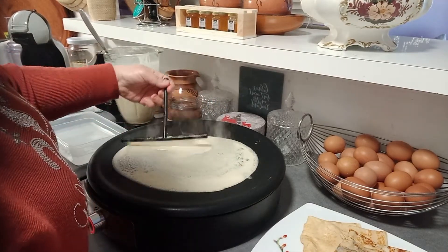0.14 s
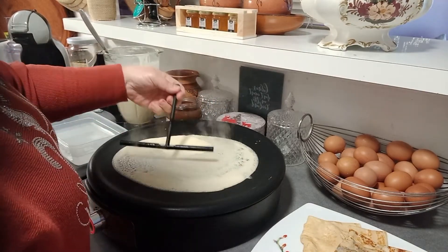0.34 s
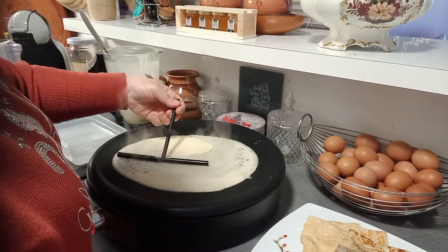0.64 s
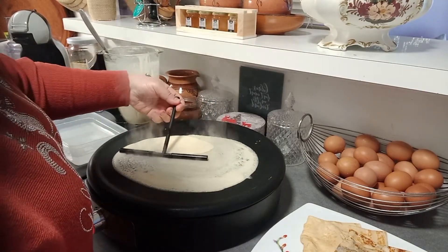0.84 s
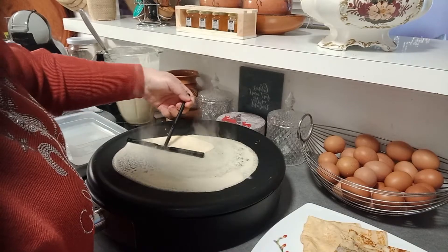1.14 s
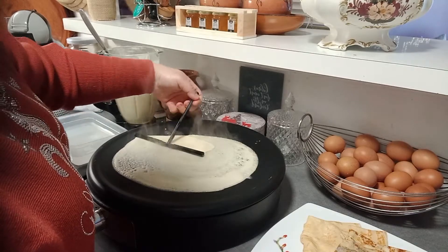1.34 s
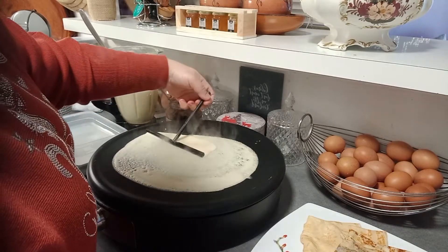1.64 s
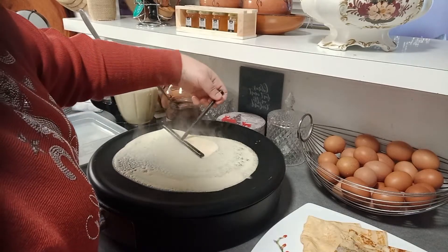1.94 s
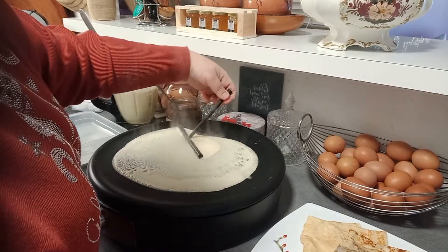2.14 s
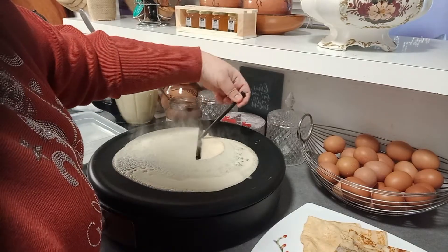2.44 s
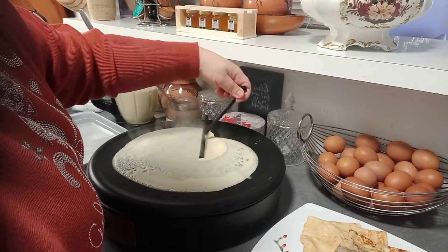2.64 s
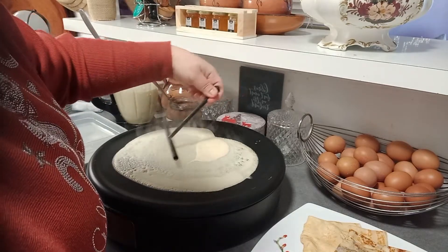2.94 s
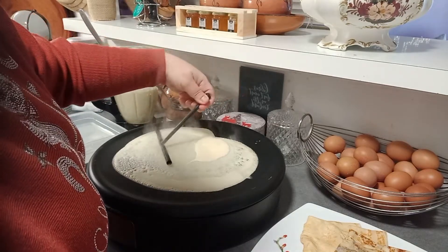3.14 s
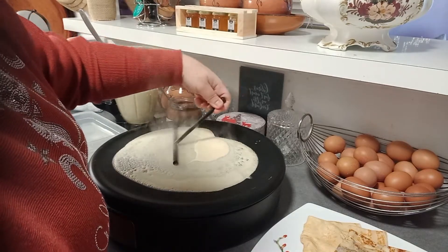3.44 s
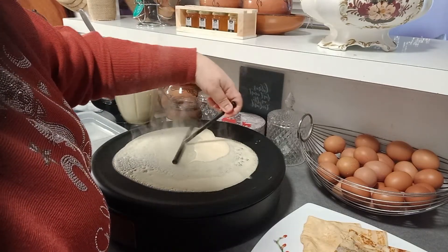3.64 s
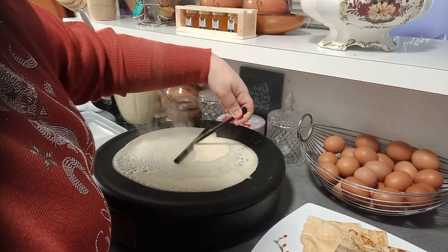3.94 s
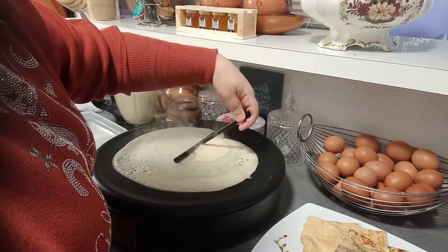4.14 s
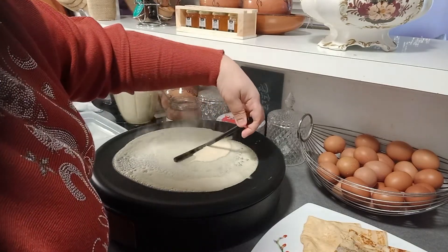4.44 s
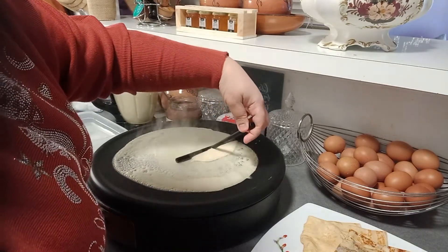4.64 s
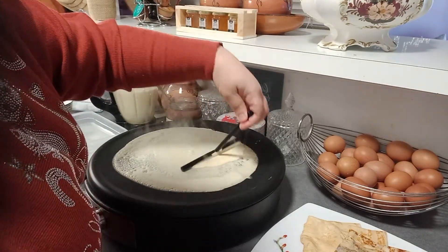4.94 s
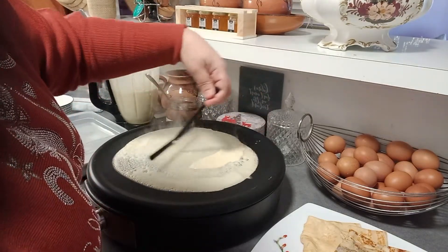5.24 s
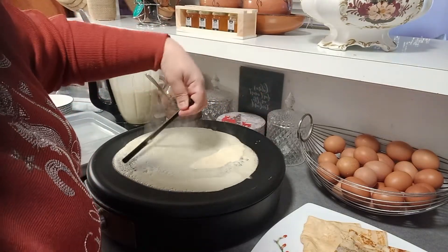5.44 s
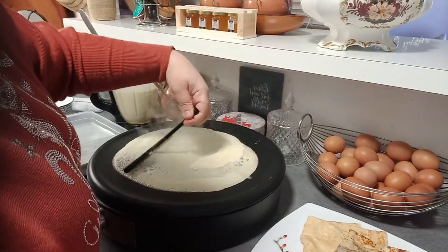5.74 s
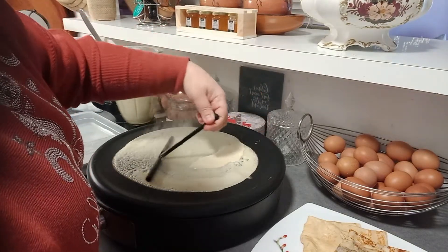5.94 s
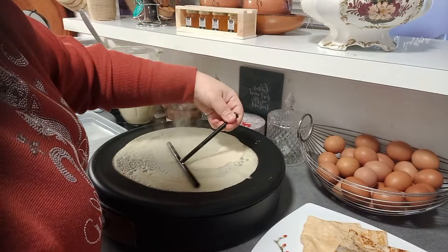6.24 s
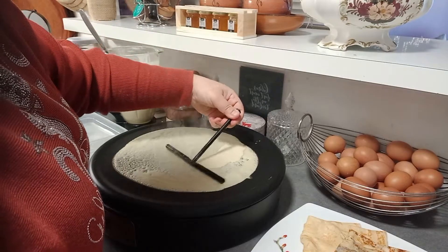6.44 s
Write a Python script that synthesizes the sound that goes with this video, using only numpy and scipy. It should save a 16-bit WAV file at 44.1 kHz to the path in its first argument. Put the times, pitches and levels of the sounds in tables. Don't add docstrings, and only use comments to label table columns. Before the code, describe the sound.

Close stereo sound of batter cooking on a hot iron plate in a small kitchen, with a faint low fan murmur far off throughout. At 0 s a strong wet hiss, bright fizz over coarse bubbling, comes with a dull hum as a spreader rubs the plate. The sizzle sinks by 1 s, then builds again to about 2.3 s with sharp pops and several clearer low humming strokes around 2 to 2.5 s. Near 3 s it drops abruptly to thin, dry crackling of separate tiny bursts, quietest around 3.8 s. Just after 3.9 s the boil returns, coarser, swelling to a peak near 4.7 s with another hum from the dragged plate. From 5 s it collapses into a flurry of crackles and spits, fading to sparse ticks, soft hiss and faint rubs by 6.5 s.

```python
import sys
import numpy as np
from scipy import signal
from scipy.fft import rfft, irfft, next_fast_len
from scipy.io import wavfile
from scipy.ndimage import uniform_filter1d, map_coordinates

SR = 44100
rng = np.random.default_rng(int(sys.argv[2]) if len(sys.argv) > 2 else 0)


def elevation(decibels):
    levels = np.asarray(decibels, float)
    return 10 ** (levels / 20)


def pcm_store(signal):
    levels = np.round(np.clip(np.atleast_2d(signal), -1, 1) * 32767)
    wavfile.write(sys.argv[1], SR, levels.astype(np.int16).T)


N = 291060
SETTING_DB_PER_S = -1.6
HALVES = np.array([[0.5], [-0.5]])


def evened(x):
    return x / np.sqrt(np.mean(x ** 2) + 1e-20)


def curves(rows):
    s, *columns = np.transpose(rows)
    return [np.interp(np.arange(N) / SR, s, column) for column in columns]


def coloured(x, points):
    f, db = np.transpose(points)
    size = next_fast_len(N)
    hz = np.minimum(np.fft.rfftfreq(size, 1 / SR), 15000)
    z = rfft(x, size)
    z = z / np.sqrt(uniform_filter1d(abs(z) ** 2, size=400) + 1e-20)
    gain = elevation(np.interp(np.log(hz + 1), np.log(f + 1), db))
    return evened(irfft(z * gain, size)[..., :N])


def resonate(x, hz, width):
    pole = np.exp((2j * np.pi * hz - np.pi * width) / SR)
    return evened(signal.lfilter([1], [1, -2 * pole, pole ** 2], x + 0j).real)


def drift(hz):
    points = rng.standard_normal(400)
    t = np.arange(0, N + 50, 50) / SR
    slow = map_coordinates(points, [t * 2 * hz], order=3, mode="wrap")
    return evened(np.interp(np.arange(N) / SR, t, slow))


# frequency in Hz, left-right correlation (0 to 1).
LIKENESS = [(60, 0.15), (180, 0.6), (350, .65), (640, 0.3), (1400, 0.15), (3100, 0), (15000, 0)]


def pair():
    size = next_fast_len(N)
    a, b = rfft(rng.standard_normal((2, size)))
    f, value = np.transpose(LIKENESS)
    same = np.interp(np.log(np.fft.rfftfreq(size, 1 / SR) + 1), np.log(f), value)
    same = np.clip(same, -1, 1)
    return irfft([a, same * a + np.sqrt(1 - same ** 2) * b], size)[:, :N]


def walls(x, wet_db, t60, count=4):
    t, out = np.arange(5000) / SR, x.copy()
    place = 2 * np.pi * np.cumsum(3.0 * (1 + 0.32 * drift(2.099))) / SR
    for k in range(count):
        taps = rng.choice([-1., 1.], (2, 5000)) * (rng.random((2, 5000)) < 0.1)
        taps *= elevation(-60 * t / t60) * (t > 0.001)
        taps /= np.linalg.norm(taps, axis=1, keepdims=True)
        share = np.cos(place / 2 + np.pi * k / count) * np.sqrt(2 / count)
        out += elevation(wet_db) * signal.oaconvolve(x * share, taps, axes=1)[:, :N]
    return out


# time in seconds, vigour in dB, bubble coarseness in dB.
BOILING = [(0.0, -44, -10.5), (0.15, -45.5, -9), (0.6, -51, -11.5), (1.0, -55, -13), (1.2, -51, -12.5),
           (1.5, -49, -8), (2.3, -45.5, -7.5), (2.7, -48, -7), (3.12, -59.5, -10), (3.4, -61.5, -14),
           (3.885, -64.5, -17.5), (3.93, -57.5, -10), (4.03, -56.5, -3), (4.35, -52, -8), (4.48, -53.5, -7),
           (4.73, -49, -9), (5.3, -63.5, -11), (6.6, -68, -16.5)]


def boiling():
    return curves(BOILING)


# frequency in Hz, level in dB per Hz.
ROOM_SPECTRUM = [(12, -61), (20, -50), (87, -9), (156, -7), (192, -15.5), (253, -4.5), (369, -14),
                 (409, -6.5), (561, -19.5), (1010, -22.5), (1220, -24.5), (1380, -15), (1500, -22.5),
                 (1850, -16.5), (3000, -47), (3900, -57), (6600, -120)]
# frequency in Hz, waver in Hz, level in dB.
FAN = [(263, .6, -79)]


def kitchen():
    t_step = 2 * np.pi / SR
    line = 0
    for hz, waver, db in FAN:
        line = line + elevation(db) * np.sqrt(2) * np.sin(t_step * np.cumsum(hz + waver * drift(2.4)))
    murmur = coloured(pair(), ROOM_SPECTRUM)
    bottom = signal.sosfiltfilt(signal.butter(2, 110, fs=SR, output="sos"), murmur)
    lumpy = murmur + (elevation(4.3 * drift(6) - 3.0) - 1) * bottom
    return elevation(-72 + 1.72 * drift(7)) * lumpy + line


# frequency in Hz, width in Hz, level in dB.
LOWEST_MODES = [(237.5, 29, 0), (309, 73, 6)]
MIDDLE_PLATE_MODES = [(426.2, 40, 0.97), (482.8, 22.5, -4.1)]
UPPER_PLATE_MODES = [(612.4, 78, 1), (657.3, 65, 0.72)]
TOP_PLATE_MODES = [(762, 32, 1.3), (851, 30, 2.3), (933, 32, 3), (983, 32, 3.6)]
# level in dB of first middle, upper, lowest, top, second middle modes.
SIMMER = [-84, -79.5, -83.5, -80, -86.5]
# start in seconds, length in seconds, force in dB,
# upper modes in relative dB, lowest modes in relative dB.
DRAGS = [(-0.05, 0.25, -60, -6.5, -7.5), (0.18, 0.25, -71.5, -0.5, 0.5), (0.777, 0.11, -70.5, 0.5, 7),
         (0.83, 0.26, -77, -3, 7.5), (1.11, 0.086, -64.5, -26, -19), (1.28, 0.26, -67, -8, -4.5),
         (1.54, 0.51, -69.5, 2.5, -6), (1.948, 0.26, -59, -4, -21), (2.186, 0.16, -65, -0.5, -22),
         (2.435, 0.12, -67.5, -1, -1), (2.78, 0.24, -83, -15, 3), (3.216, 0.75, -77, -25, -2),
         (3.965, 0.13, -85.5, 8, 13.5), (4.088, 0.12, -68.5, -4, -9), (4.55, 0.23, -83, 4, 8),
         (4.176, 0.39, -70.5, -8, 2), (4.637, 0.15, -59, -21, -11), (4.74, 0.37, -71, -43, -4),
         (5.683, 0.21, -79, -7.5, -0.5), (5.97, 0.088, -82, 2.5, 8), (6.324, 0.086, -78, -5, -4)]


def spreader():
    grip_s, lift_s = 0.06, 0.15
    t = np.arange(0, N, 60) / SR
    damping_db = np.array([[0], [1], [0], [1], [0]]) * SETTING_DB_PER_S * t
    vigour_db = boiling()[0][::60]
    power = elevation(np.array(SIMMER)[:, None] + damping_db + 0.83 * (vigour_db + 56.5)) ** 2
    for s, length, db, upper_db, low_db in DRAGS:
        touch = np.minimum((t - s) / grip_s + 0.5, (s + length - t) / lift_s + 0.5)
        touch = np.clip(touch, 0, 1)
        top_db, second_db = -3 + 1.83 * upper_db, 0.7 * upper_db
        share_db = np.array([[-2], [upper_db], [low_db], [top_db], [second_db]])
        power = power + (elevation(db + share_db) * touch ** 2) ** 2
    rub = pair() * elevation(1.9 * drift(22))
    groups = (MIDDLE_PLATE_MODES[:1], UPPER_PLATE_MODES, LOWEST_MODES, TOP_PLATE_MODES,
              MIDDLE_PLATE_MODES[1:])
    out = 0
    for group_power, modes in zip(power, groups):
        ring = evened(sum(elevation(db) * resonate(rub, hz, width) for hz, width, db in modes))
        out = out + np.interp(np.arange(N) / SR, t, np.sqrt(group_power)) * ring
    return out


# time in seconds, peak in dB, low part in relative dB.
BURSTS = [(0.6604, -40.9, -7.8), (0.7388, -36.3, -11.3), (0.8442, -41.4, -12.8), (1.7426, -36.7, -11.4),
          (2.1174, -33.3, -8.9), (2.5807, -34.5, -8.8), (2.7254, -33.3, -14.7), (2.9269, -38.4, -11.4),
          (3.0187, -44.8, -7.7), (3.0395, -37.5, -14.7), (3.0765, -46.6, -5.6), (3.0828, -46.4, -10.5),
          (3.1075, -45.9, -10.1), (3.126, -46.9, -16.8), (3.1785, -47.2, -10.0), (3.2537, -43.3, -20.7),
          (3.3162, -45.5, -13.6), (3.3432, -44.7, -17.0), (3.3562, -44.6, -20.1), (3.3706, -45.8, -15.9),
          (3.3844, -45.6, -18.0), (3.408, -38.5, -14.0), (3.4575, -49.3, -18.2), (3.5039, -45.3, -13.2),
          (3.5185, -49.2, -14.5), (3.5295, -47.8, -17.8), (3.572, -47.1, -16.0), (3.5885, -46.9, -16.0),
          (3.7737, -51.5, -14.8), (4.3376, -39.7, -10.1), (5.0343, -42.2, -18.0), (5.067, -39.2, -8.9),
          (5.0794, -42.5, -6.3), (5.089, -40.6, -17.4), (5.0951, -44.8, -12.0), (5.1129, -44.7, -15.0),
          (5.1639, -44.3, -13.9), (5.1869, -45.9, -14.3), (5.2772, -47.3, -13.1), (5.2868, -52.1, -12.3),
          (5.346, -47.4, -3.9), (5.356, -42.9, -8.5), (5.3703, -50.4, -7.8), (5.4049, -45.2, -6.3),
          (5.4178, -51.4, -9.4), (5.4687, -50.5, -9.0), (5.497, -48.0, -8.9), (5.5127, -44.5, -19.3),
          (5.55, -49.4, -12.0), (5.6608, -48.8, -16.6), (5.7536, -53.9, -15.2), (5.7837, -51.6, -9.5),
          (5.9668, -50.3, -15.6), (5.9823, -51.3, -9.7), (6.0115, -54.8, -12.9), (6.0811, -54.9, -17.2),
          (6.1028, -50.7, -10.6), (6.4133, -56.0, -10.3), (6.4858, -49.6, -18.5), (6.5206, -51.6, -15.4)]


def pops():
    strays, stray_db, stray_low_db = 120, -59, -15
    out, t = np.zeros((2, N + 900)), np.arange(800) / SR
    when, size = rng.random((strays, 2)).T
    at = (when * (N - 1)).astype(int)
    peak_db = stray_db + 0.6 * (boiling()[0][at] + 60) + 8 * size
    rows = list(BURSTS) + list(np.transpose([at / SR, peak_db, np.full(strays, stray_low_db)]))
    noise = rng.standard_normal((len(rows), 2, 2, 800))
    noise[:, :, 1] += 1.2 * np.roll(noise[:, :, 0], shift=4, axis=-1)
    noise[:, :, 1] /= np.hypot(1, 1.2)
    pans_db = -4 + 2 * rng.standard_normal(len(rows))
    high = signal.butter(3, [6500, 17000], "band", fs=SR, output="sos")
    low = signal.butter(2, [2000, 6000], "band", fs=SR, output="sos")
    shape = np.exp(-t / 0.00015) + 0.2 * np.exp(-t / 0.005)
    brights = signal.sosfilt(high, shape * noise[:, 0])
    dulls = signal.sosfilt(low, shape * noise[:, 1])
    for (s, db, low_db), pan_db, bright, dull in zip(rows, pans_db, brights, dulls):
        tick = bright / abs(bright).max() + elevation(low_db + 4) * dull / abs(dull).max()
        start = round(s * SR)
        out[:, start:start + 800] += elevation(db + 3 + HALVES * pan_db) * tick
    return walls(out[:, :N], -9.0, 0.35, count=2)


def bubbles(per_s, spread_db, burst_s, alike, count=12):
    size = elevation(spread_db * np.minimum(rng.exponential(1, N), 5)) * (rng.random(N) < per_s / SR)
    size /= np.sqrt(per_s)
    patch, t, out = rng.integers(0, count, N), np.arange(128) / SR, np.zeros((2, N))
    for k in range(count):
        puff = rng.standard_normal((2, 128)) * np.exp(-t / burst_s)
        puff[1] += alike * np.roll(puff[0], shift=5)
        puff /= np.linalg.norm(puff, axis=1, keepdims=True)
        out += signal.oaconvolve((size * (patch == k))[None], puff, axes=1)[:, :N]
    return evened(out)


# frequency in Hz, level in dB per Hz.
FIZZ_SPECTRUM = [(2060, -24.5), (3500, -5), (5140, -1), (5980, -3), (6290, -5.5), (7600, -1), (11000, 1),
                 (12800, 4.5), (14500, 1.5), (15700, 1)]
# frequency in Hz, level in dB per Hz.
BOIL_SPECTRUM = [(470, -71), (800, -31), (845, -18), (917, -22.5), (1070, -7), (1640, -4.5), (1860, 0.5),
                 (2270, -1), (2470, 0.5), (2670, -1.5), (2900, -1), (5050, -8.5), (5580, -22),
                 (7000, -19.5), (9100, -32), (15400, -120)]
# middle in seconds, length in seconds, level in dB.
STEAM_POCKETS = [(0.864, 0.026, -1), (1.108, 0.021, 0), (1.294, 0.034, 2), (3.015, 0.016, 1),
                 (3.27, .08, 0.5), (3.595, 0.056, 0.5), (5.032, 0.11, 1), (5.097, 0.016, 4.5),
                 (5.202, 0.043, 4), (5.37, 0.075, 2.5), (5.428, 0.021, 3.5), (5.44, 0.03, -2.5),
                 (5.525, 0.37, 1.5), (5.705, 0.051, -3), (5.97, 0.03, 1), (6.415, 0.19, -1.5),
                 (4.168, 0.09, 0.5), (3.872, 0.021, -0.5), (4.332, 0.032, 2.5), (4.427, 0.019, 0),
                 (4.84, 0.033, 0), (4.897, 0.032, -1.5), (5.118, 0.035, 1.5), (5.222, 0.028, -1),
                 (5.292, 0.039, 1), (5.324, 0.033, -2), (5.403, 0.022, -3), (5.498, .02, 0.5),
                 (5.584, .04, 1), (3.344, .02, 0), (3.794, 0.027, 0.5), (2.767, 0.023, 1),
                 (2.972, 0.028, -3), (3.952, .05, 1), (3.903, .025, -1), (2.861, .02, -2.5)]
# time in seconds, left minus right in dB.
BATTER_PAN = [
    (0, 0),
    (2.2, 0),
    (2.8, 0),
    (4.7, -1),
    (5.3, 0),
    (6.6, -1),
]


def sizzle():
    t = np.arange(N) / SR
    fizz_db, boil_db = boiling()
    for s, length, db in STEAM_POCKETS:
        fizz_db = fizz_db + db * np.exp(-(2 * (t - s) / length) ** 2)
    pan_db = curves(BATTER_PAN)[0]
    flicker_db = 0.5 * drift(8) + 0.31 * drift(25)
    swarm = elevation(0.6 * (fizz_db + 56))
    fizz = walls(bubbles(7000 * swarm, 2.3, 0.00018, 0.019), -6, 0.11)
    fizz = coloured(fizz, FIZZ_SPECTRUM) * elevation(0.13 * drift(13))
    boil = walls(bubbles(8000 * swarm, 2.57, 0.0004, 0.54), -2.5, 0.09)
    boil = coloured(boil, BOIL_SPECTRUM) * elevation(boil_db + 0.19 * drift(12))
    deep = signal.sosfiltfilt(signal.butter(3, 1730, fs=SR, output="sos"), boil)
    boil = boil + (elevation(4.5 + SETTING_DB_PER_S * t) - 1) * deep
    return elevation(fizz_db + flicker_db + HALVES * pan_db) * (elevation(5.5) * fizz + elevation(5.0) * boil)


def scene():
    return kitchen() + spreader() + pops() + sizzle()


# frequency in Hz, left minus right in dB.
MICROPHONE_LEAN = [(290, -0.5), (640, 0), (1410, -1.0), (3100, 1.5), (5000, -.5), (9000, -2), (13000, 0.4)]
# frequency in Hz, margin in dB.
GAP_MARGIN = [(40, 14), (250, 17), (850, 8), (1300, 8.5), (2600, 6.3), (3500, 5.8), (4500, 6.3),
              (5600, 6), (6300, 8.5), (7000, 7.5), (9000, 10), (14000, 15), (15500, 25)]


def gapped(x, depth_db):
    edge_hz, bottom_hz, bottom_margin_db = 15740, 100, 3
    lead = 1024 - 413
    x = np.pad(x, ((0, 0), (lead, 0)))
    hz, t, z = signal.stft(x, SR, nperseg=2048, noverlap=1024)
    z = z * elevation(HALVES * np.interp(hz, *np.transpose(MICROPHONE_LEAN)))[..., None]
    power = uniform_filter1d((abs(z) ** 2).mean(0), size=7, axis=0) + 1e-20
    octaves = np.log2(hz + 300)
    reach = np.exp(-((octaves[:, None] - octaves) / 0.6) ** 2)
    neighbours = reach @ power / reach.sum(1, keepdims=True)
    under_db = 10 * np.log10(neighbours / power)
    under_db -= np.interp(hz, *np.transpose(GAP_MARGIN))[:, None]
    loud_db = 10 * np.log10(power.sum(0))
    under_db += 0.1 * np.minimum(loud_db.max() - loud_db, 22)
    patches = uniform_filter1d(rng.standard_normal(power.shape), size=7, axis=0)
    under_db += 2.3 * evened(patches)
    bottom = hz < bottom_hz
    hum_power = power[(hz > 200) & (hz < 600)].mean(0)
    hum_db = 10 * np.log10(hum_power / (abs(z[:, bottom]) ** 2).mean((0, 1)))
    wavering_db = uniform_filter1d(hum_db + 4 * evened(patches[0]), size=4)
    under_db[bottom] = wavering_db - np.median(hum_db) - bottom_margin_db
    kept = elevation(-depth_db / (1 + np.exp(-np.clip(under_db / 0.4, -30, 30))))
    z = z * kept * (hz < edge_hz)[:, None]
    return signal.istft(z, SR, nperseg=2048, noverlap=1024)[1][:, lead:][:, :N]


def band_limit(x):
    return signal.sosfilt(signal.butter(12, 16970, fs=SR, output="sos"), x)


def record(dry):
    thinned = gapped(dry, 30)
    return band_limit(thinned)


dry = scene()
out = record(dry)
pcm_store(out)
```